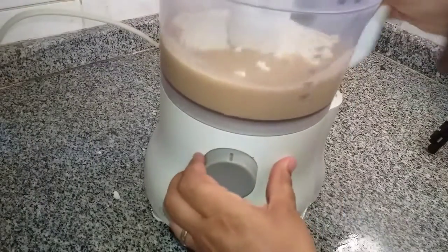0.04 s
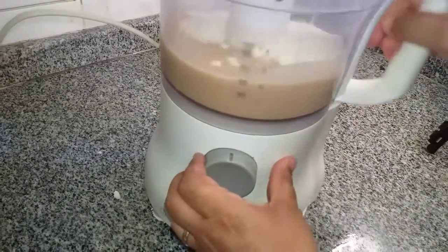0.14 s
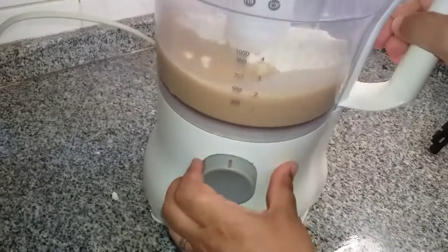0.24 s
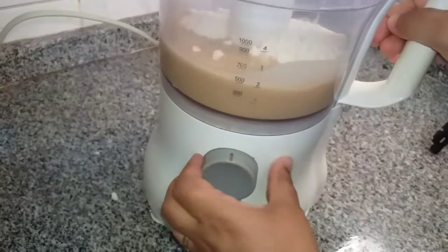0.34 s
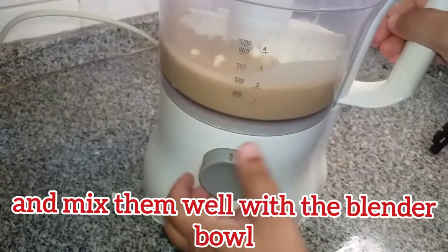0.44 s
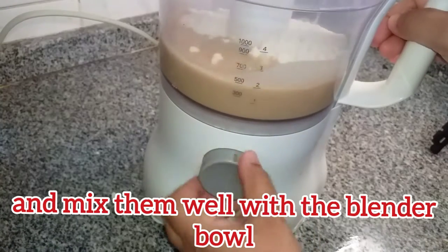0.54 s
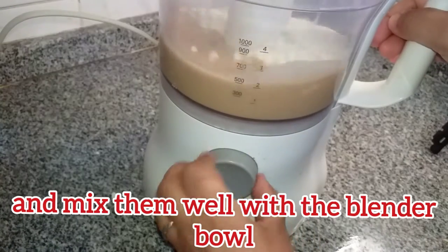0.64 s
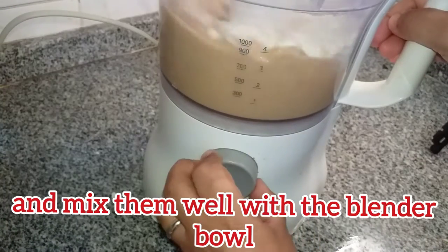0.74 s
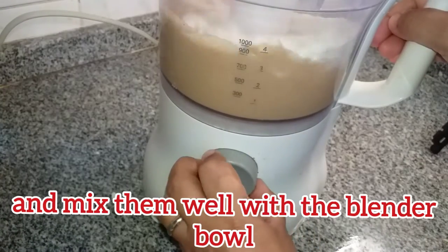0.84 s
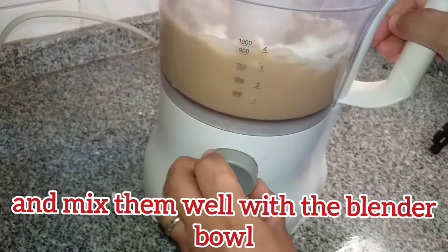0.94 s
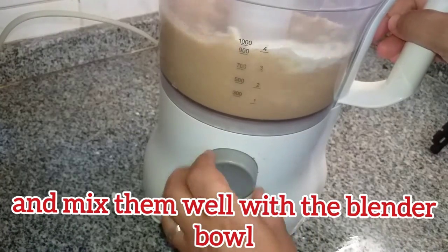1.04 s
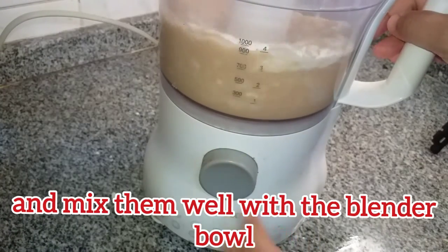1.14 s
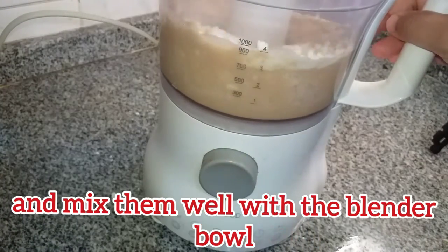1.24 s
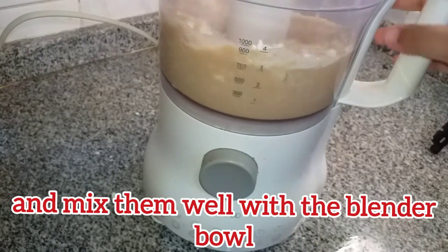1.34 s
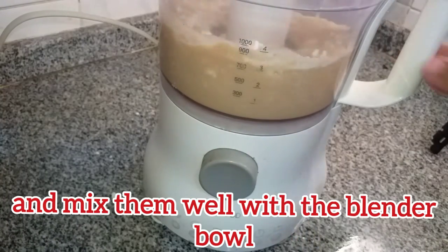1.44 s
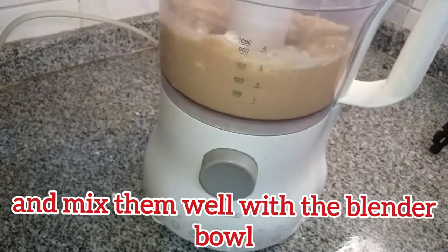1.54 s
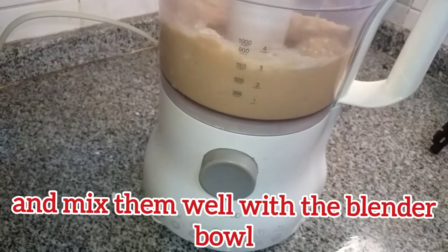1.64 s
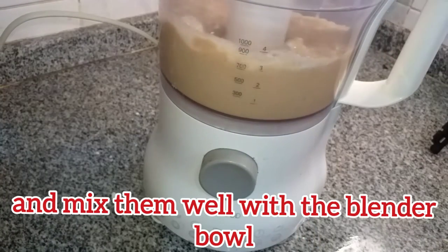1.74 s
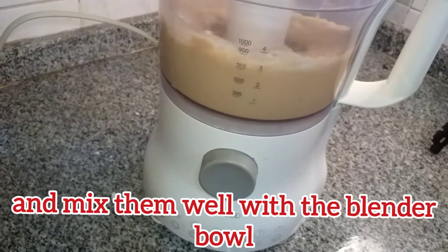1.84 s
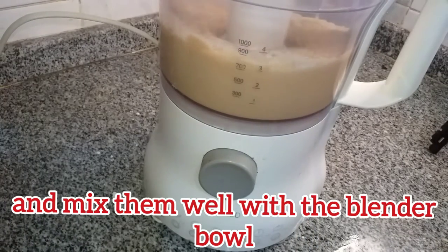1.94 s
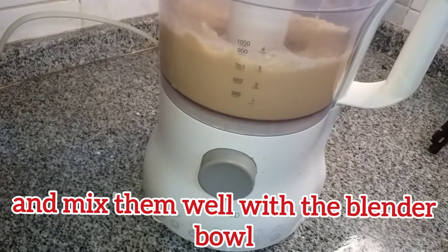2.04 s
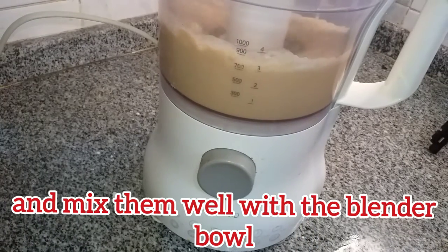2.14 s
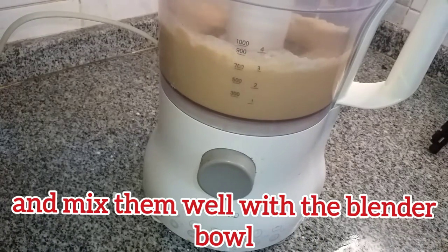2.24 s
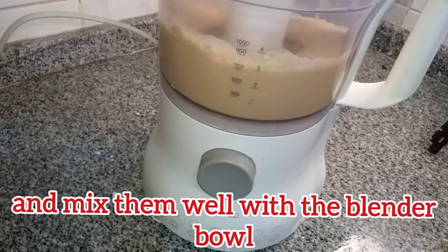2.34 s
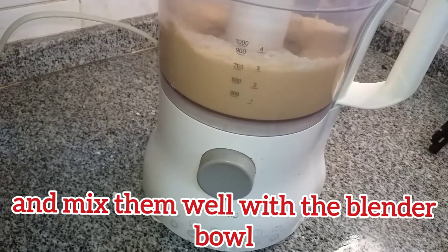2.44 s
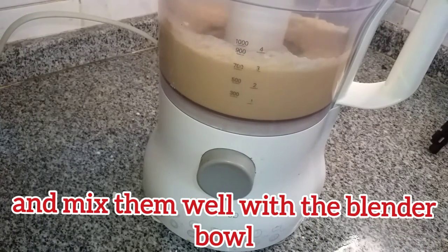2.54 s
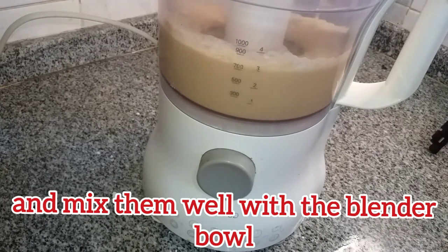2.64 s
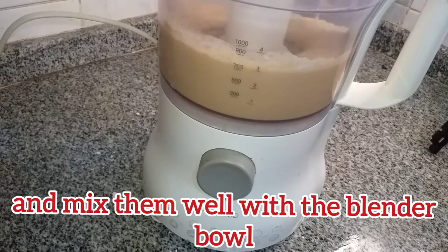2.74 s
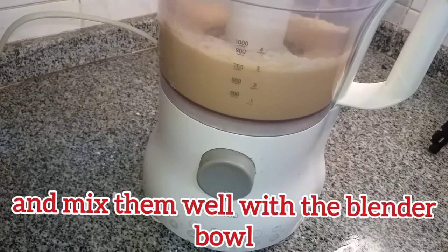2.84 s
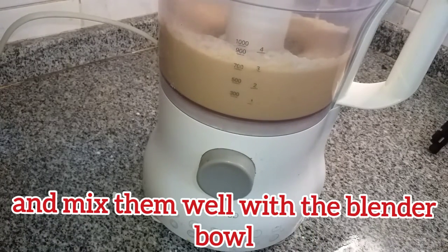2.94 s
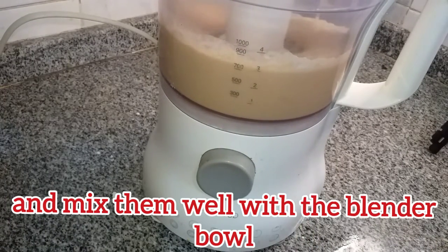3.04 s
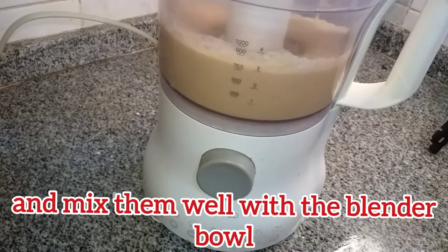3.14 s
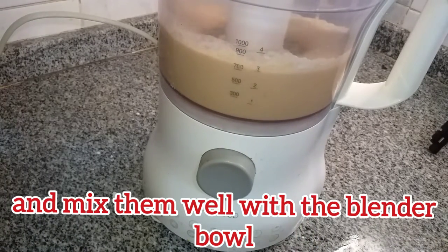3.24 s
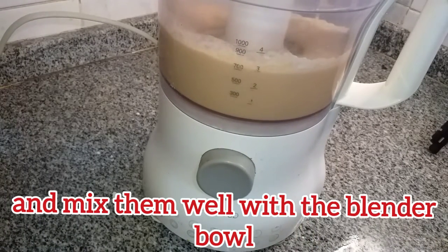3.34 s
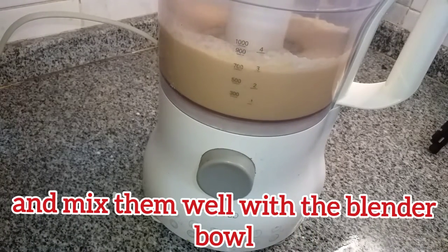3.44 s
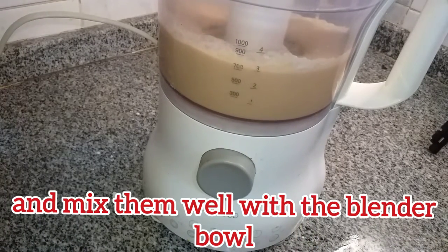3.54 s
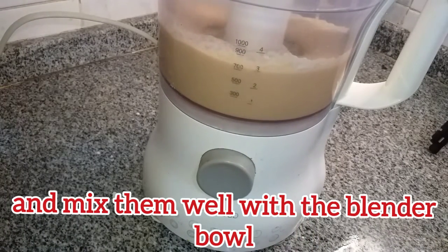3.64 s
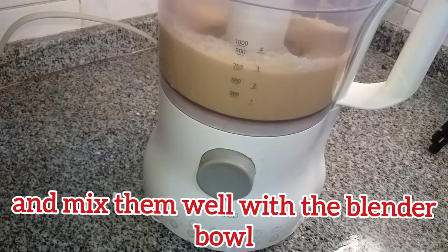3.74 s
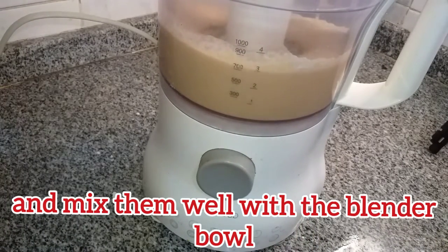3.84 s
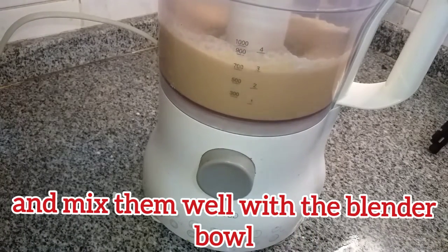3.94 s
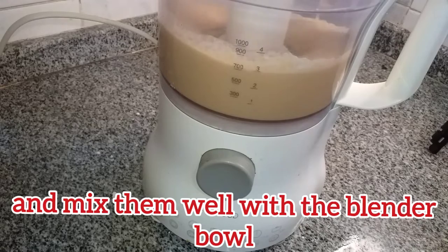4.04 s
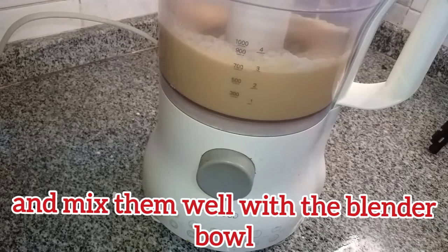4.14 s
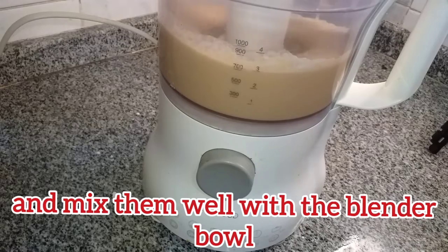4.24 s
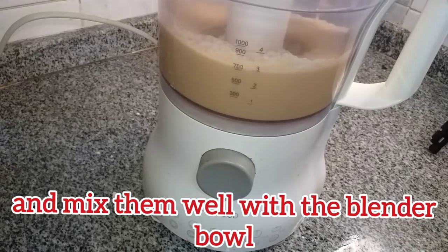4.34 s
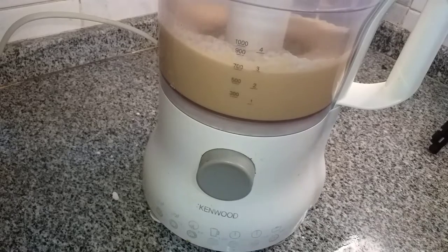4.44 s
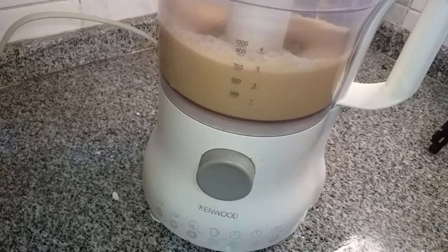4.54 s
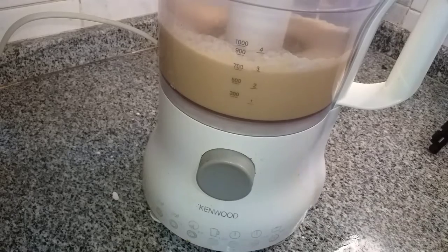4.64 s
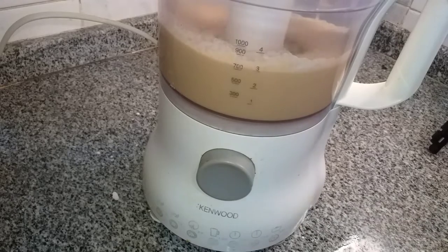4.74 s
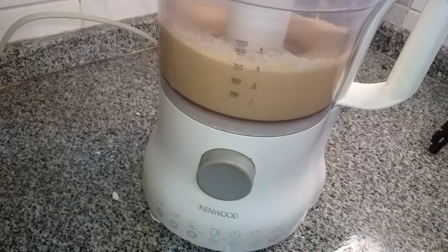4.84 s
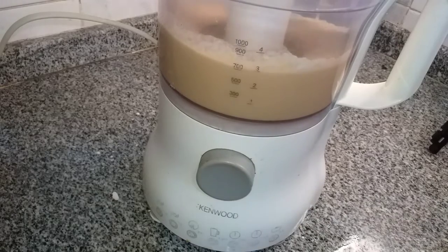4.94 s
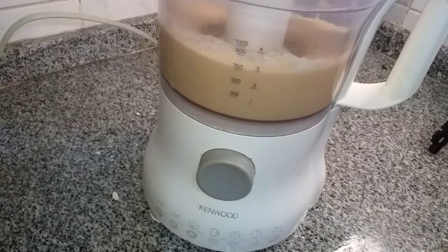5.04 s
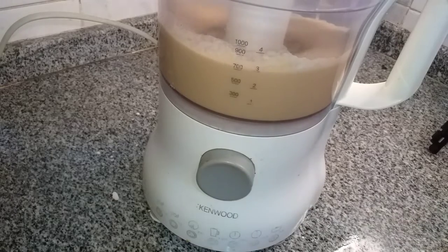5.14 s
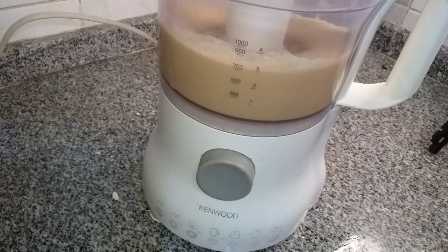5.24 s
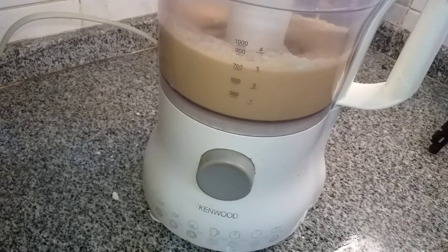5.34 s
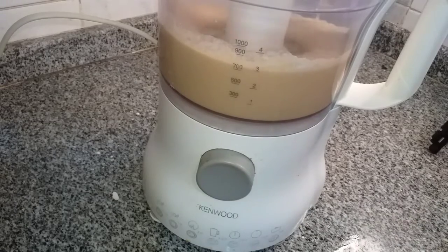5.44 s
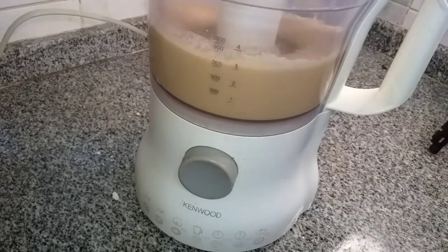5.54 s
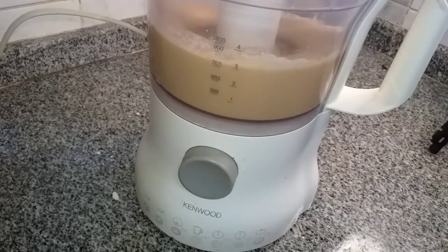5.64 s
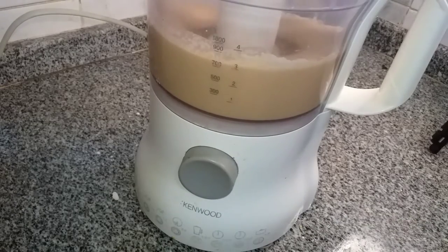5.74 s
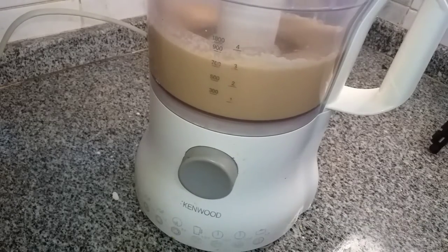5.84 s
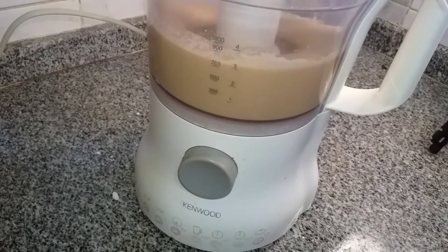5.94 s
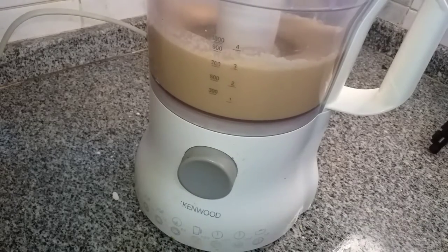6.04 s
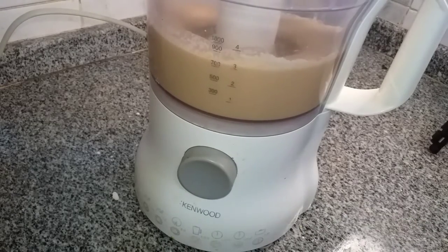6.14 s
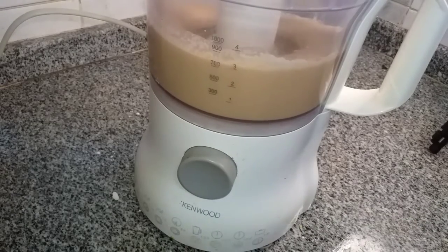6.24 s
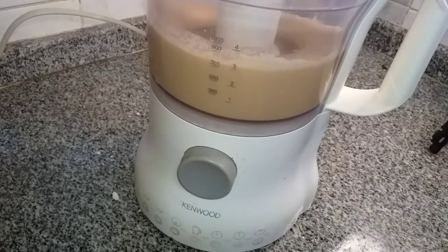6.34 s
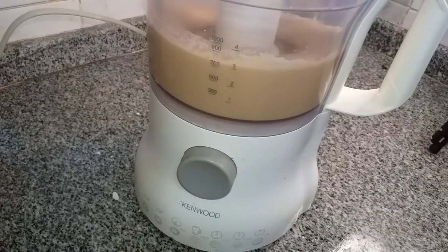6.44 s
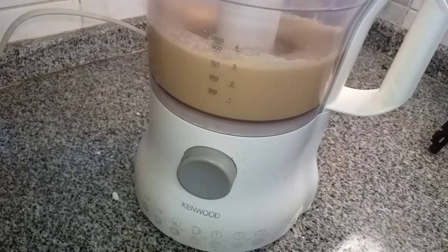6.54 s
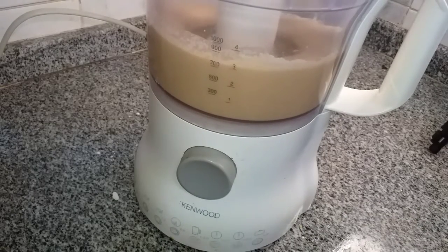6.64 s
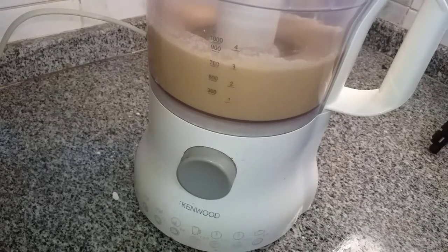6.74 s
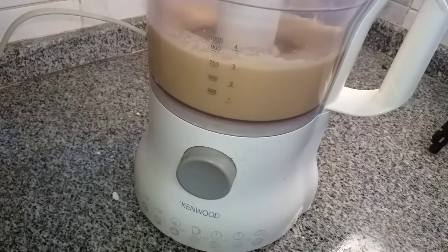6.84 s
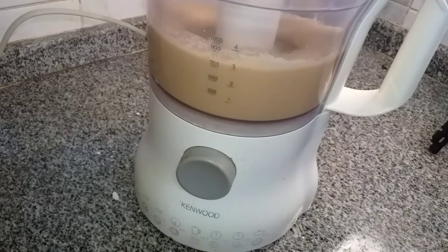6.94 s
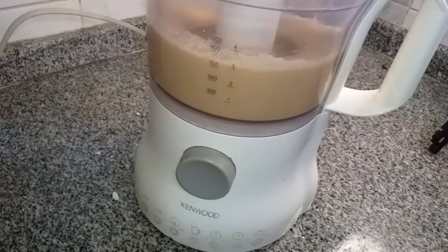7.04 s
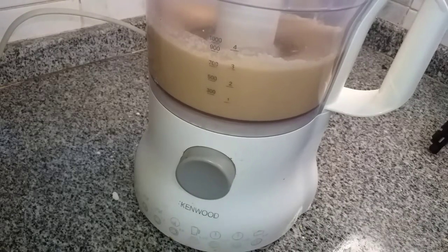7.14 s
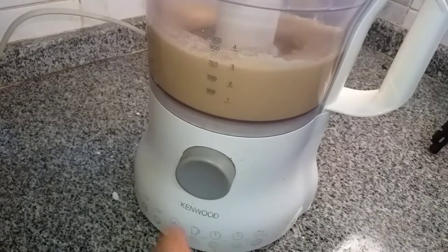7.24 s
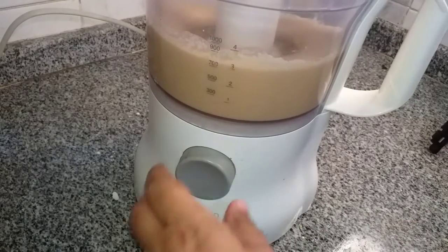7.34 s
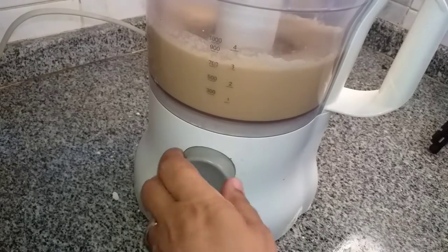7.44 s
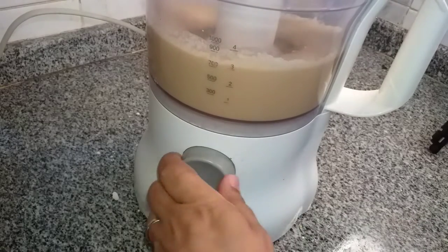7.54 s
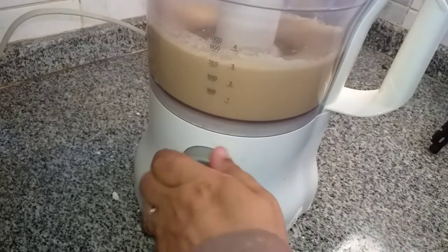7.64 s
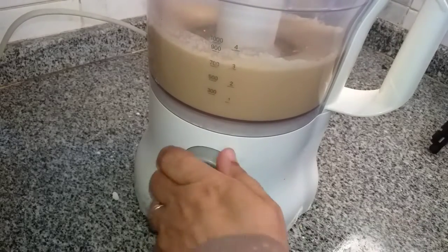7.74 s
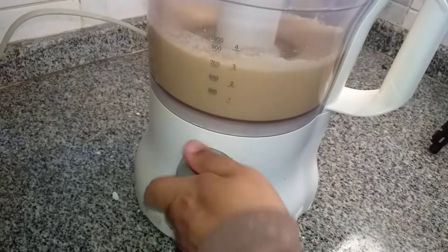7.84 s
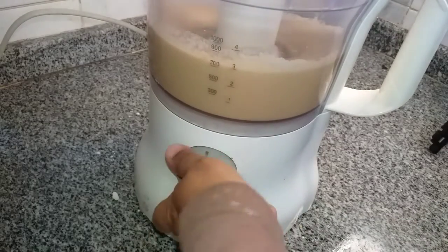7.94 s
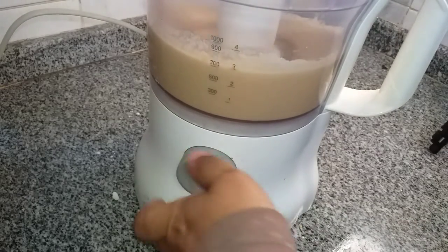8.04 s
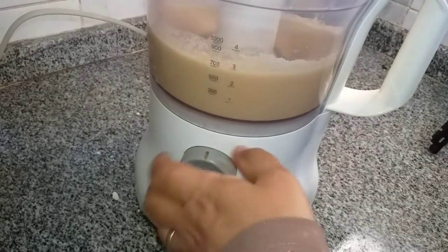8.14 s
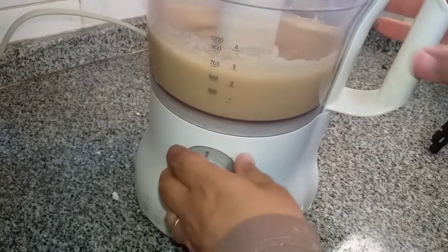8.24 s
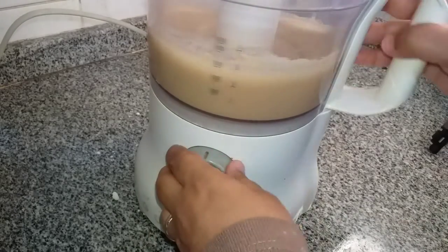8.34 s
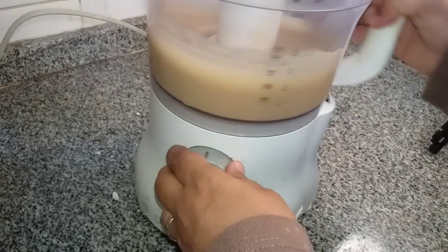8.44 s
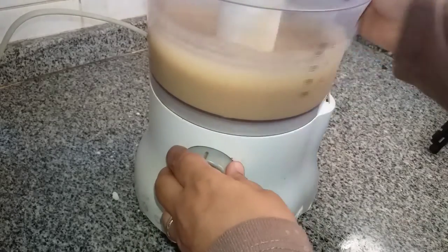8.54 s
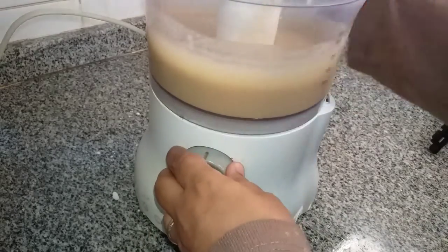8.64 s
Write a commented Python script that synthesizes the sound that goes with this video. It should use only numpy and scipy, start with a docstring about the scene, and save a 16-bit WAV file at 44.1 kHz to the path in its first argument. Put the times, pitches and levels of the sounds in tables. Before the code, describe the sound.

Close to the microphone on a kitchen counter, a plastic bowl clatters onto its base and a food processor clicks on. Its motor whines over a rushing noise as batter and seeds hit the bowl with hollow, splashy taps. After a tiny gap it runs a little faster and the taps grow busier. Then the whine falls away, ending with a plastic knock and faint handling.

```python
"""A food processor on a stone kitchen counter, close to a phone. First hands slide on the plastic bowl,
knock it into its seat and click the knob. The motor runs up: air, brushes and batter roar, and the
gear teeth whine. Soon the blade is throwing seeds at the bowl, which booms at each slap. At about
5.5 s the sound drops out for a moment and returns faster. Then the motor is switched off and runs
down, and last the bowl is knocked loose."""
import sys
import numpy as np
from scipy.fft import rfft, irfft, next_fast_len
from scipy.io import wavfile
from scipy.ndimage import map_coordinates

SR = 44100
rng = np.random.default_rng(int(sys.argv[2]) if len(sys.argv) > 2 else 0)


def unload_audio(sound):
    """Save the sound as a 16-bit wav file, at the path given as the first command line argument."""
    columns = np.transpose(np.atleast_2d(sound))
    # keep every value between -1 and 1, then stretch to whole-number steps
    steps = np.round(np.clip(columns, -1, 1) * 32767)
    wavfile.write(sys.argv[1], SR, steps.astype(np.int16))


N = 383669
TIME = np.arange(N) / SR
ON_S, DROP_S, BACK_S, OFF_S = .56, 5.538, 5.558, 7.812  # motor on, sound drops out, returns, motor off


def amp(db):
    """Turn decibels into a gain."""
    return 10 ** (np.asarray(db) / 20)


def unit(x):
    """Scale a signal to an average power of 1."""
    return x / np.sqrt(np.mean(x ** 2) + 1e-20)


def colour(spectrum, hz):
    """Gain at hz, read between rows of f/Hz, level/dB."""
    freqs, db = np.transpose(spectrum)
    return amp(np.interp(np.log(hz + 1), np.log(freqs + 1), db))


def curves(rows):
    """Join timed rows with straight lines, one curve for each column after the time."""
    times, *columns = np.transpose(rows)
    return [np.interp(TIME, times, column) for column in columns]


def wobble(rate, step=1):
    """A smooth curve steered by `rate` random values a second."""
    points = rng.standard_normal(int(N * rate / SR) + 4)
    return map_coordinates(points, [np.arange(0, N, step) * rate / SR], order=2)


def filtered(x, response):
    """Scale each frequency in x by response(hz)."""
    size = next_fast_len(len(x) + 8192)
    return irfft(rfft(x, size) * response(np.fft.rfftfreq(size, 1 / SR)), size)[:len(x)]


def noise(spectrum, size):
    """Noise with the given tone colour."""
    return unit(filtered(rng.standard_normal(size), lambda hz: colour(spectrum, hz)))


def blow(modes, t):
    """A struck object rings with dying tones, their strength and pitch a little different each time."""
    return sum(amp(db + rng.normal(0, 1.6) - 60 * t / fade_s)
               * np.sin(2 * np.pi * hz * rng.normal(1, 0.037) * t) for hz, db, fade_s in modes)


# how loud the handling is: t/s, hiss level/dB, rumble level/dB
HANDLING = [(0, -60, -48), (.108, -58, -69), (.19, -56.5, -64), (.268, -61, -60), (.338, -80, -74),
            (.424, -83.5, -75), (.52, -86, -81), (.6, -73, -84), (8.4, -66.5, -70), (8.51, -62, -70),
            (8.574, -68.5, -67), (8.7, -76.5, -70)]
# tone colours of the sliding palms and the shifting base: f/Hz, level/dB
PALM_HISS = [(240, -32), (400, -15), (459, -31), (837, -18), (904, -22), (3840, -25.5), (5640, -18),
             (8280, -47), (15800, -41)]
BASE_RUMBLE = [(15, -58), (25, -35), (85, -0.5), (226, -5), (339, -7), (700, -36), (910, -66), (1540, -120)]
# faint tones of the turning knob: start t/s, end t/s, f/Hz, level/dB
KNOB_CREAKS = [(.47, .58, 553, -79), (0.499, .6, 945, -71)]
def hands():
    """Palms slide on the bowl and the base shifts on the counter; the knob sings faintly."""
    hiss_db, rumble_db = curves(HANDLING)
    out = amp(hiss_db + 1.4 * wobble(30)) * noise(PALM_HISS, N)
    out += amp(rumble_db + 3.9 * wobble(20)) * noise(BASE_RUMBLE, N)
    for start, end, hz, db in KNOB_CREAKS:
        swell = np.sin(np.pi * np.clip((TIME - start) / (end - start), 0, 1))
        out += swell * amp(db + 3.3 * wobble(40.8)) * np.sin(2 * np.pi * hz * TIME + wobble(30))
    return out


# knocks and clicks: t/s, level/dB, thud offset/dB, rise/s, time for the clatter to fade 60 dB/s
KNOCK_HITS = [(.002, -56.5, 7, .002, .15), (.08, -46.5, -1.5, .003, .087), (.178, -32, -9, 0.0082, .19),
              (.194, -22, -12.5, .0016, 0.077), (.208, -31, -12, .003, .1), (.224, -39.5, -2.5, .003, 0.21),
              (.374, -39.5, -3.5, 0.013, 0.082), (.6, -46.5, -27, .002, .06), (.614, -34, -18, .002, 0.13),
              (8.361, -48, -22, .003, .073), (8.445, -31.5, -26, 0.00094, .14), (8.54, -52, -8, .003, .11),
              (8.59, -58, 4, .002, .088), (8.632, -59, 9, 0.0011, .082)]
# tone colour of the clatter: f/Hz, level/dB
CLATTER = [(180, -31), (300, -1.5), (592, -11.5), (699, -6), (1310, -6), (2020, -9), (2200, -10.5),
           (5740, -3.5), (8990, -34.5), (15800, -27)]
# tones of the bowl hitting its base: f/Hz, level/dB, time to fade 60 dB/s
THUD_TONES = [(99, -10.5, 0.19), (172, -2, 0.1), (258, -0.5, 0.069), (557, -4, 0.052), (840, -8, 0.073),
              (1000, -5, 0.042)]
def knocks():
    """Plastic hits plastic: a clatter that dies away in the kitchen, over the thud of the bowl."""
    out, t = np.zeros(N + SR), np.arange(SR // 4) / SR
    for start, db, thud_db, rise_s, fade_s in KNOCK_HITS:
        onset = 1 - np.exp(-t / rise_s)
        clatter = amp(-7 - 60 * t / fade_s) * noise(CLATTER, len(t))
        thud = amp(thud_db) * blow(THUD_TONES, t)
        out[round(start * SR):][:len(t)] += amp(db) * onset * (clatter + thud)
    return out[:N]


# tooth rates (gear teeth meeting per second): running up or down; thick, mixed, thin batter; fast
SWEEP_HZ, THICK_HZ, MIXED_HZ, THIN_HZ, FAST_HZ = 760, 792, 809, 826, 878
# tooth rate while the machine works: t/s, f/Hz
WORKING_RATE = [(.98, 800), (1.27, 781), (1.49, 795), (1.67, 783), (1.93, 793.5), (2.41, 799.4),
                (2.81, 793.3), (3.21, 802.4), (3.49, 802), (4.6, 813), (5.13, 819.3), (5.53, 833),
                (5.56, 874.8), (7.05, 876.6), (7.15, 881.5), (7.81, 882.3)]
def tooth_rate(run_up_s=.137, coast_s=.365):
    """The gear runs up to working speed after switch-on and coasts down after switch-off."""
    working, = curves(WORKING_RATE)
    run_up = 1 - np.exp(-(np.clip(TIME - ON_S, 1e-4, None) / run_up_s) ** 1.5)
    coast = np.exp(-(np.clip(TIME - OFF_S, 0, None) / coast_s) ** 1.2)
    return working * run_up * coast


# the machine at work: t/s, level/dB, bass boost/dB, boost of the base's ring/dB
WORK_LEVELS = [(.8, -37, -2.5, 7.5), (1.3, -38.5, 2.5, 10), (1.7, -37.5, 3, 6), (2.15, -37, 7.5, 2),
               (2.35, -38.5, -0.5, 5), (2.9, -37.5, -0.5, 2), (4, -36.5, -0.5, 5.5),
               (5.53, -37.5, -1.5, 3.5), (5.6, -37.5, -5.5, -3), (7.2, -36.5, -4, 0), (7.8, -37, -4, 1)]
def motor_levels(rate, grip_s=0.674, grip_rise_s=0.042):
    """Overall level and treble, bass and ring boosts in dB: the blade idles, grips, works and slows."""
    work_db, bass_db, ring_db = curves(WORK_LEVELS)
    idle = np.clip(1 - (TIME - grip_s) / grip_rise_s, 0, 1)
    surge = np.exp(-np.abs(TIME - grip_s - grip_rise_s) / 0.025)
    slowness = np.clip(1 - rate / SWEEP_HZ, 0, 1)
    settled = np.clip((TIME - OFF_S - 0.13) / 0.036, 0, 1)
    slowing = np.log(np.clip(rate / FAST_HZ, .05, 1)) ** 2 * (TIME > OFF_S)
    return (work_db - 9 * idle + 3.5 * surge - 6 * slowing,
            np.where(TIME < BACK_S, -1.3, 3) - 11 * slowness,
            bass_db + 6 * idle - 12 * settled,
            ring_db + 16 * idle + 25 * slowness ** 2 * settled)


def flutter(hz=43):
    """A quick, nearly regular tremble of the loudness."""
    return np.sin(2 * np.pi * hz * TIME + 1.7 * wobble(4))


# pitches that the base and bowl boost or soften: f/Hz, width/Hz, boost/dB
RESONANCES = [(144, 61, 6.5), (262.4, 28, 13), (420, 25, 2.5), (990, 56, 0.5), (1498, 66, 6), (1454, 50, 3),
              (1295, 123, -3), (765, 44, 2), (1118, 47, 2.5), (12500, 90, 7), (1967, 150, 4.5),
              (2400, 72, 3), (462, 27, -27), (3800, 150, -1), (5210, 170, -3), (6840, 160, -3),
              (7520, 420, -3.5), (2900, 99, 5.5), (4940, 140, 2), (5940, 230, 2.5)]
def housing(hz):
    """The base and bowl ring along, passing some pitches more strongly than others."""
    return 1 + sum((amp(db) - 1) / np.sqrt(1 + (2 * (hz - centre) / width) ** 4)
                   for centre, width, db in RESONANCES)


# tone colour of the roar at the slow and the fast speed: f/Hz, level/dB
ROAR_SLOW = [(24, -70), (40, -37), (117, -16), (198, -19.5), (255, -13.5), (464, -15.5), (785, -6),
             (1260, -8), (1580, 0), (1980, -13.5), (2360, -8.5), (3800, -8), (5810, 5), (8890, -23.5),
             (15800, -20)]
ROAR_FAST = [(24, -61), (40, -47), (120, -10.5), (193, -17), (261, -5.5), (453, -14), (868, -2), (1260, -7),
             (1500, -0.5), (1880, -12.5), (2030, -9), (3800, -10.5), (5960, 2.5), (8890, -31.5),
             (15800, -25)]
def roar(treble_db, bass_db, ring_db, ring_hz=972, ring_width_hz=80):
    """Air, brushes and batter make an uneven rushing noise, coloured by the housing."""
    unevenness = amp(0.38 * wobble(9) + 1.1 * wobble(45)) * (1 + .12 * flutter())
    rush = unevenness * rng.standard_normal(N)
    slow = unit(filtered(rush, lambda hz: colour(ROAR_SLOW, hz) * housing(hz)))
    fast = unit(filtered(rush, lambda hz: colour(ROAR_FAST, hz) * housing(hz)))
    body = np.where(TIME < BACK_S, slow, fast)
    # low rumble, fan hiss and the ring of the base each get their own boost
    bass = filtered(body, lambda hz: 1 / (1 + (hz / 600) ** 4))
    treble = filtered(body, lambda hz: 1 / (1 + (7800 / (hz + 1)) ** 16))
    ring = filtered(body, lambda hz: 1 / (1 + (2 * (hz - ring_hz) / ring_width_hz) ** 2))
    return body + (amp(bass_db) - 1) * bass + (amp(treble_db) - 1) * treble + (amp(ring_db) - 1) * ring


# gear tones, a row for 1, 2, 3... times the tooth rate: level/dB against the roar at each named rate
MAIN_TONES = [(-10.5, -21, -16.5, -17, -16), (-10.5, -4.5, -10.5, -13.5, -20),
              (-11.5, -20.5, -16.5, -21.5, -36), (-19, -23, -19.5, -17, -23.5), (-12, -22, -17, -22, -9.5),
              (-15, -12.5, -13, -6, -23), (-11, -14, -11.5, -5.5, -2), (-4.5, -6.5, -12, -10, -12.5),
              (-7, -21, -15.5, -25, -33)]
# fainter tones heard near one speed only: multiple of the tooth rate, that rate f/Hz, level/dB
FAINT_TONES = [(11, 790, -36), (11, 820, -36), (9.3, 785, -29), (10, 822, -31), (10, 878, -46),
               (14, 790, -37), (18, 788, -36), (11, 878, -40), (12, 757, -7.5), (12, 878, -34),
               (13, 812, -28), (16, 812, -36), (16, 784, -24), (16, 830, -30), (16, 878, -36),
               (17, 812, -34), (18, 815, -32), (4 / 3, 878, -22.5), (1.52, 812, -20), (2.295, 878, -18.5),
               (3.06, 792, -22), (3.06, 878, -22), (10 / 3, 878, -20.5), (19 / 3, 878, -30),
               (22 / 3, 878, -32), (37 / 3, 796, -39), (.75, 770, -11), (35 / 3, 878, -42),
               (49 / 3, 878, -38)]
def gear_tones(rate, fall_db_per_hz=0.7):
    """Give each gear tone's multiple of the tooth rate and its level in dB, which follows the speed."""
    for multiple, db in enumerate(MAIN_TONES, start=1):
        yield multiple, np.interp(rate, [SWEEP_HZ, THICK_HZ, MIXED_HZ, THIN_HZ, FAST_HZ], db)
    for multiple, loudest_hz, db in FAINT_TONES:
        yield multiple, db - fall_db_per_hz * np.abs(np.clip(rate, SWEEP_HZ, FAST_HZ) - loudest_hz)


def whine(rate, teeth=24, lowest_hz=516, step=64):
    """Meeting gear teeth make tones; each wavers and rasps on its own and throbs with the blade shaft."""
    load = np.interp(rate, [825, 870], [1, .4])  # thick batter at first loads the gear unevenly
    # below working speed the teeth chatter: the pitch smears and the high tones fade
    slack = np.clip(1 - rate / 770, 0, 1)
    phase = 2 * np.pi * np.cumsum(rate + 0.94 * load * wobble(35) + 8 * slack * wobble(90)) / SR
    # loudness is worked out only once every `step` samples
    times, coarse_rate, slack, load = TIME[::step], rate[::step], slack[::step], load[::step]
    sweeping = np.clip((785 - coarse_rate) / 25, 0, 1)
    tones = 0
    for multiple, db in gear_tones(coarse_rate):
        hz = multiple * coarse_rate
        # while the speed sweeps, tones flare at each resonance; the small base gives off few low ones
        low_cut = 1 + (lowest_hz / hz) ** 6
        flare = (colour(ROAR_FAST, hz) * housing(hz) ** 1.6 / low_cut / 1.3) ** sweeping
        waver_db = .7 * multiple ** 0.35 * wobble(18, step)
        rasp_db = 1.1 * load * wobble(80, step)
        strain_db = -95 / multiple * slack * (times < OFF_S)  # straining up to speed sinks low tones most
        throb = 1 + 0.18 * np.sin(phase[::step] / teeth + multiple)
        level = flare * throb * amp(db - 1.25 * multiple * slack + strain_db + waver_db + rasp_db)
        tone = np.sqrt(2) * np.sin(multiple * phase + rng.uniform(0, 2 * np.pi))
        tones += np.interp(TIME, times, level) * tone
    shake = 1 + 0.27 * np.clip((THIN_HZ - rate) / 30, 0.2, 1) * flutter()
    # when the current stops, the teeth unload for a moment
    unload_db = np.interp(TIME - OFF_S, [0, .01, .05, .07], [0.5, -14, -8, 2.2])
    return tones * shake * amp(unload_db)


def motor():
    """The geared motor roars and whines for as long as it turns."""
    rate = tooth_rate()
    level_db, treble_db, bass_db, ring_db = motor_levels(rate)
    running = np.clip((TIME - .612) / 0.0047, 0, 1) * np.clip((8.5 - TIME) / 0.048, 0, 1)
    return running * amp(level_db) * (roar(treble_db, bass_db, ring_db) + whine(rate))


# seeds hitting the bowl wall: t/s, level/dB, splash offset/dB
SEED_HITS = [(1.609, -42, -3), (1.722, -39, 0), (1.793, -37, -1), (1.978, -44, -4), (2.043, -46, 16),
             (2.16, -37, 4), (2.353, -39.5, 5), (2.498, -49, 10), (2.657, -40, -3), (3.013, -42, 1),
             (3.086, -40.5, 11), (3.495, -46, 13), (3.536, -44, -1), (3.698, -37, 6), (4.031, -44, -3),
             (4.349, -44, -3), (4.672, -43, -3), (4.982, -39, -2), (5.138, -42, -2), (5.417, -40, -3),
             (5.648, -39.5, 8), (5.736, -36, 0), (5.796, -44, 0), (5.843, -33.5, 4.5), (5.924, -32.5, 1),
             (6.058, -38.5, -4), (6.105, -34, 0), (6.143, -37, 0), (6.194, -31, 0), (6.276, -33, 0.5),
             (6.35, -40, -1), (6.427, -35, -2), (6.542, -35.5, 2), (6.618, -32, 3), (6.664, -39, -5),
             (6.705, -40, 4), (6.775, -37, 2), (6.861, -32.5, 0.5), (6.945, -31.5, -1), (7.021, -31.5, 0),
             (7.131, -40, 1), (7.18, -33.5, -1), (7.267, -38, 0), (7.406, -36.5, 0), (7.524, -33.5, 0),
             (7.611, -33.5, 3), (7.665, -44, 13), (7.717, -38.5, 0), (7.804, -33.5, 3), (7.89, -40, 4)]
# tones of the booming bowl: f/Hz, level/dB, time to fade 60 dB/s
BOWL_TONES = [(123, -13, 0.037), (264.7, 2, 0.07), (614, 5, 0.038), (763, 5.5, 0.03), (883, 3.5, 0.033),
              (505, 1.5, 0.024), (1470, -12, 0.033), (2959, -5, .02)]
# tone colour of the splash: f/Hz, level/dB
SPLASH_COLOUR = [(1500, -10), (3000, 4.5), (6000, -3), (8800, -17.5), (11000, -11), (15800, -15)]
def seeds(thick_rise_s=0.0026, thin_rise_s=0.0014):
    """Seeds and batter slap the wall, which booms with a splash; many small hits come at random."""
    out, t = np.zeros(N + SR), np.arange(SR // 8) / SR
    small_hits = [(1 + 6.8 * when ** 1.05, -49 + 8.5 * size, -14 + 7 * size)
                  for when, size in rng.random((160, 2))]
    for start, db, splash_db in list(SEED_HITS) + small_hits:
        splash_shape = amp(splash_db + 2.5 - 60 * t / 0.03) * (1 - np.exp(-t / 0.00094))
        splash = splash_shape * noise(SPLASH_COLOUR, len(t))
        rise_s = thick_rise_s if start < BACK_S else thin_rise_s  # thick batter cushions a slap
        boom = blow(BOWL_TONES, t) * (1 - np.exp(-t / rise_s))
        out[round(start * SR):][:len(t)] += amp(db - 4.2) * (boom + splash)
    return out[:N]


def scene():
    """All the sounds together; they drop out for a moment and fade back in."""
    cut = (DROP_S - TIME) / 0.00062
    fade_in = np.clip((TIME - BACK_S) / 0.023, 0, 1) ** 0.85
    dropout = np.clip(np.maximum(cut, fade_in), amp(-41.5), 1)
    return (dropout * (motor() + seeds() + knocks() + hands()))[None]


def record(dry):
    """The phone's microphone loses the deep bass and the very highest treble."""
    bass_hz, top_hz = 45, 15740
    return filtered(dry[0], lambda hz: (hz < top_hz) / (1 + (bass_hz / (hz + 1)) ** 4))[None]


dry = scene()
out = record(dry)
unload_audio(out)
```